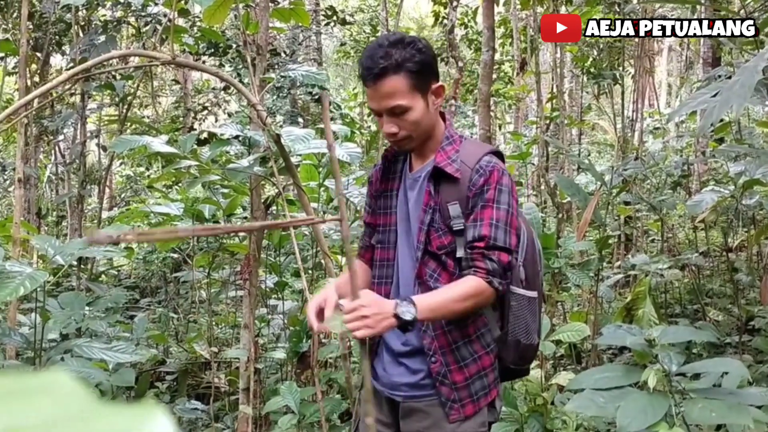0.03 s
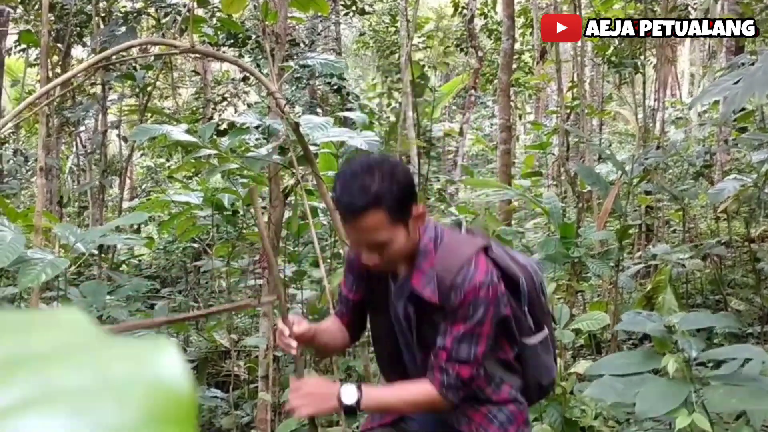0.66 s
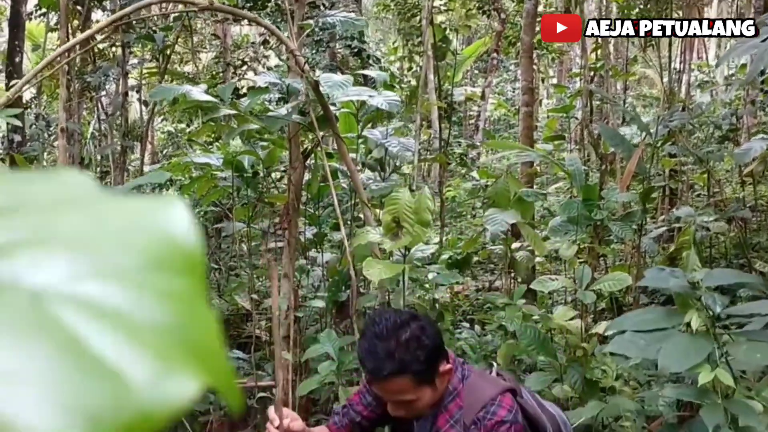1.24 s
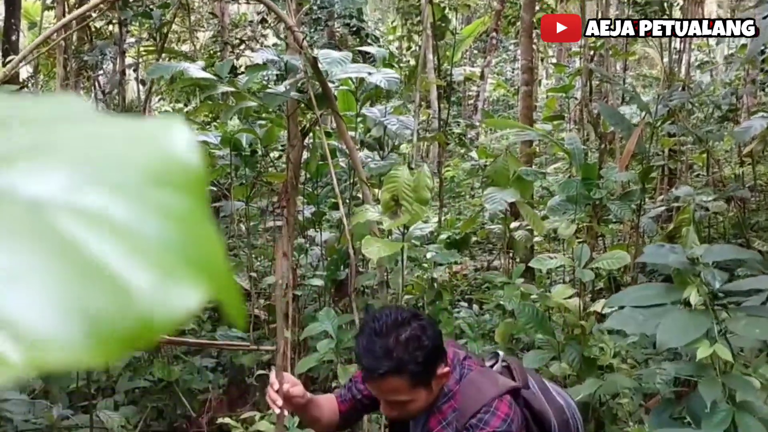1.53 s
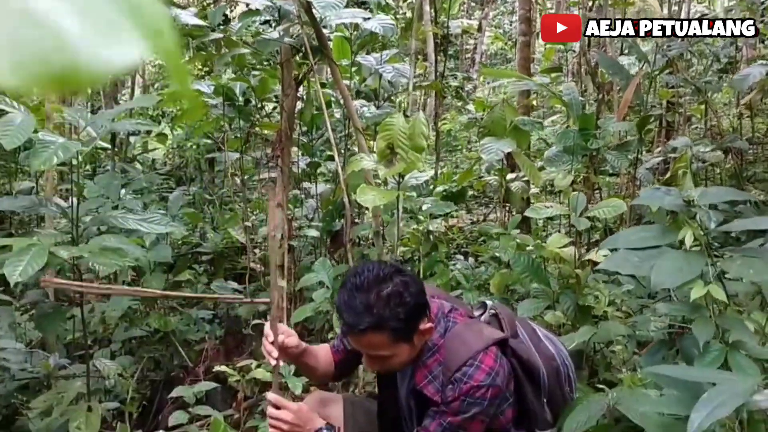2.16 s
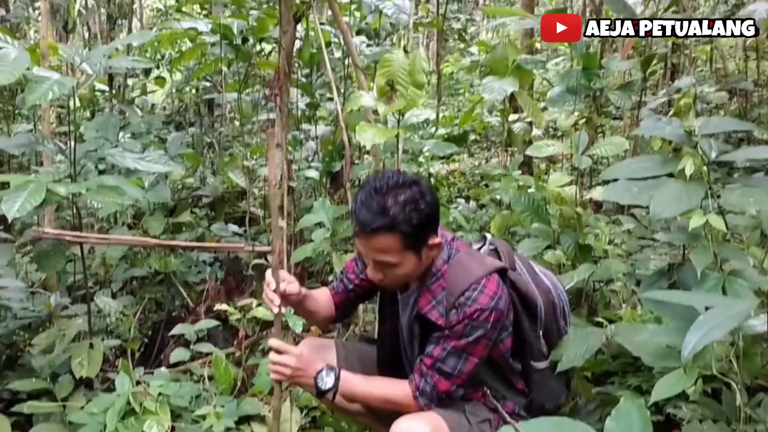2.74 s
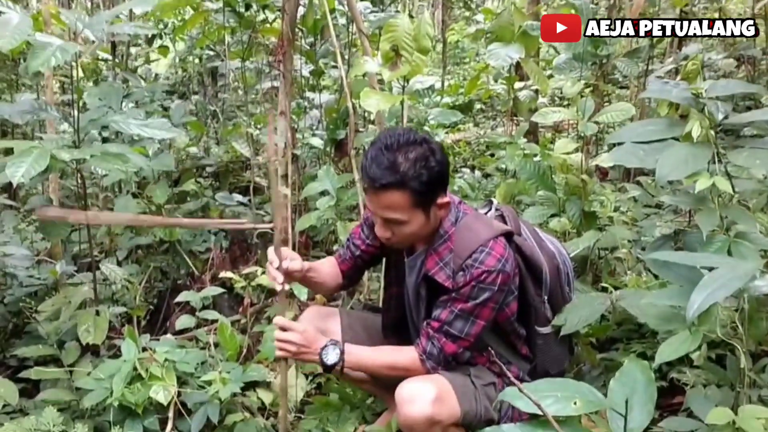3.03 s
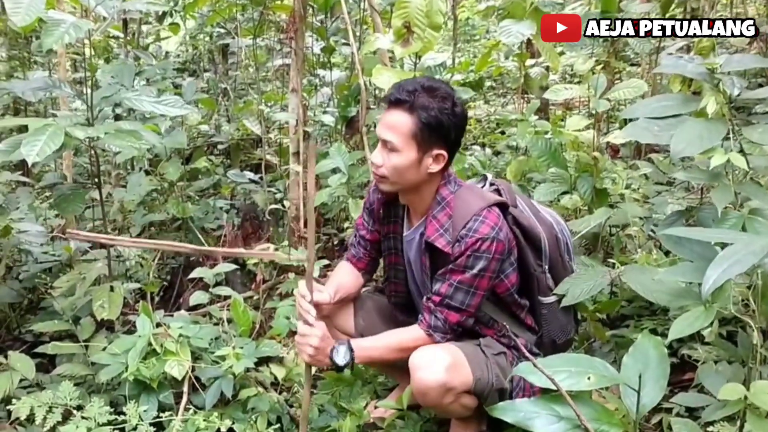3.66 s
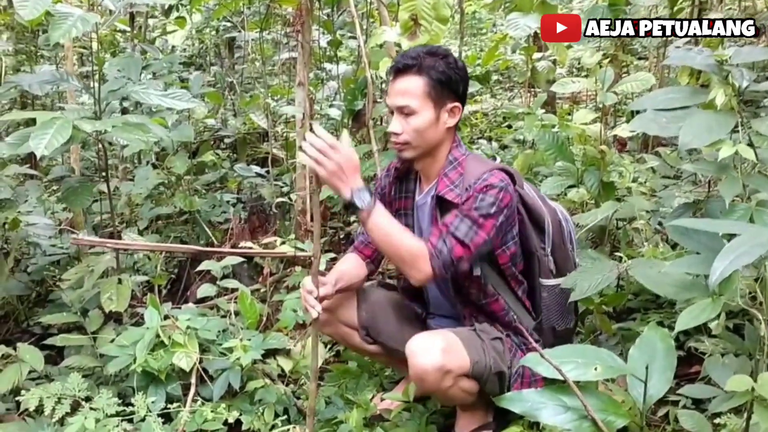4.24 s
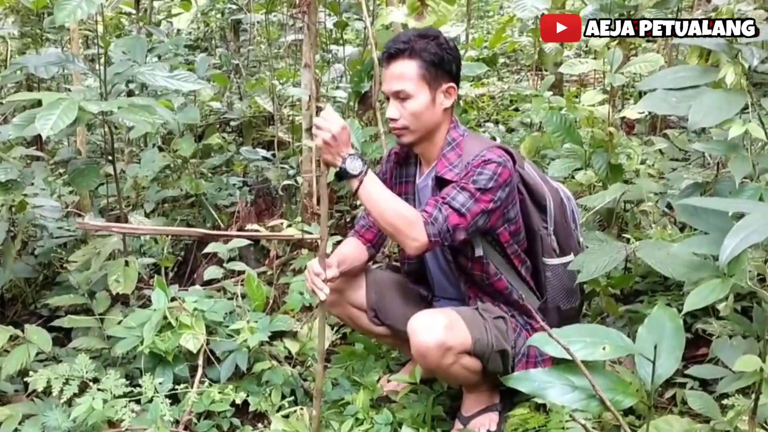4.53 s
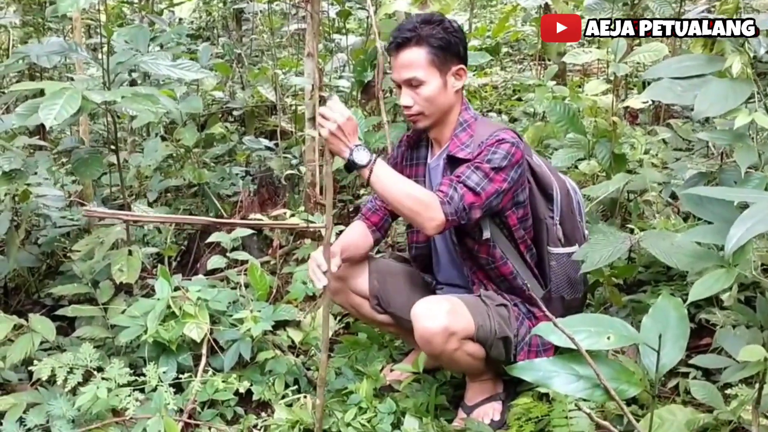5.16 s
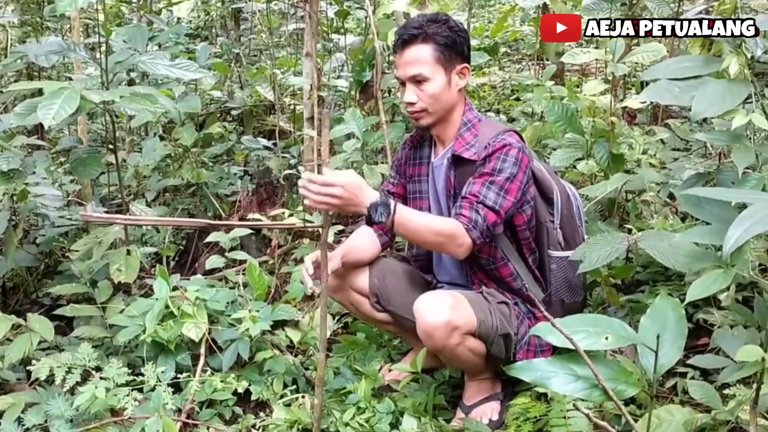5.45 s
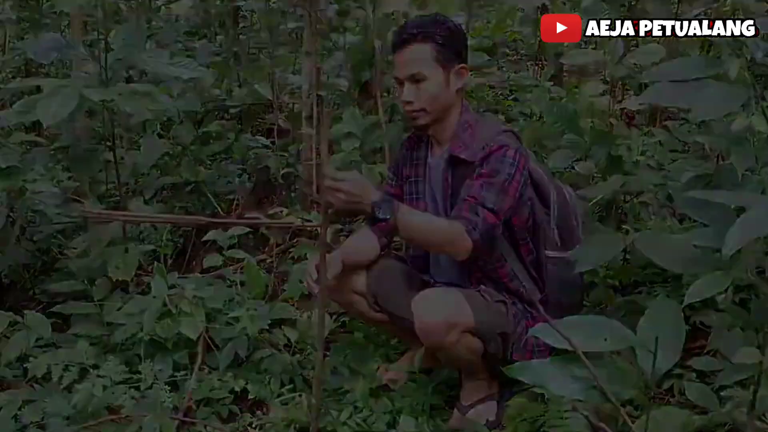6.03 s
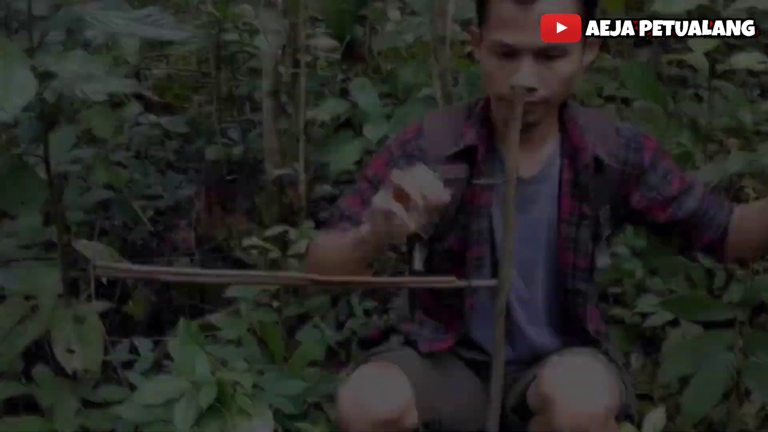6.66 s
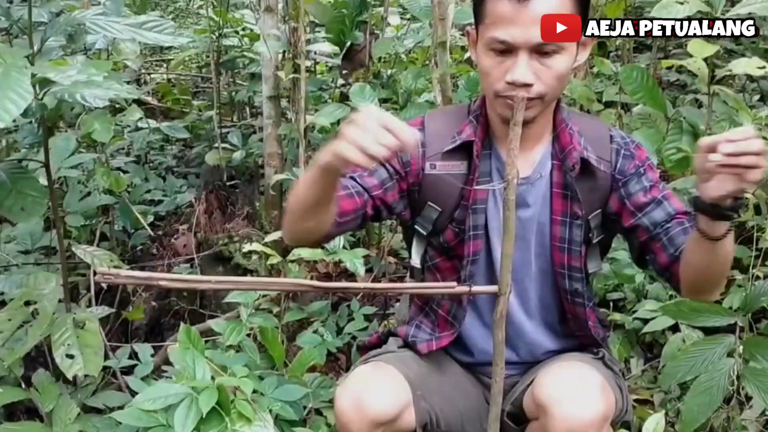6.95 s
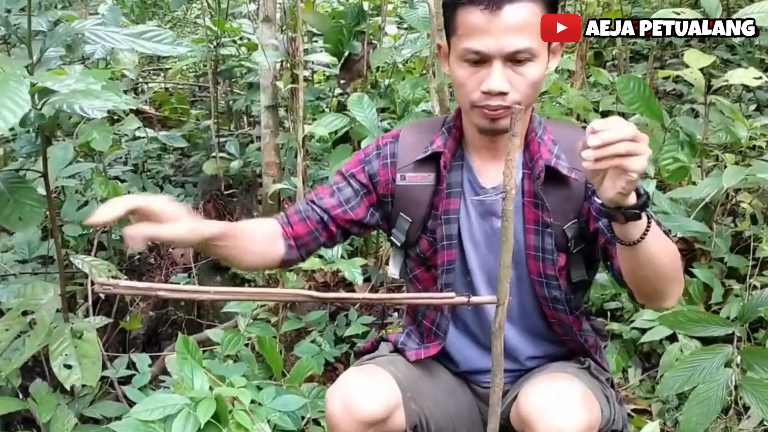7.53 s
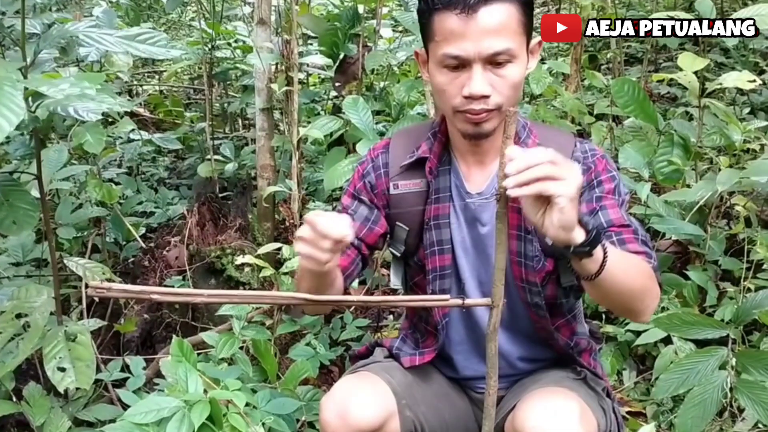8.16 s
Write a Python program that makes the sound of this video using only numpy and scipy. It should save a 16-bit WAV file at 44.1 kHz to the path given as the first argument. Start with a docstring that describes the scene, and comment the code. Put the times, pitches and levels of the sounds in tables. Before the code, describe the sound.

A small bird repeats one rising whistle nearly four times a second, echoing through a forest over hushed air and shrill cicadas and crickets. Someone nearby handles a stick in the undergrowth, making a few light knocks and leafy crackles. A far bird hoots softly and a cicada's whine swells. Everything fades to a brief silence, then returns quieter, with the whistling bird further off.

```python
"""A small forest bird repeats one rising whistle, nearly four times a second; trunks and leaves echo it.
Cicadas and crickets shrill over hushed air, a far bird hoots softly, and a thin call sounds once.
Someone handles a stick in the undergrowth: a few ringing knocks and leafy crackles.
The sound fades to silence and comes back at a quieter spot, where the bird is further off."""
import sys
import numpy as np
from scipy import signal
from scipy.fft import rfft, irfft, next_fast_len
from scipy.io import wavfile
from scipy.ndimage import map_coordinates

SR = 44100
rng = np.random.default_rng(int(sys.argv[2]) if len(sys.argv) > 2 else 0)


def pcm_store(signal):
    """Save signal as 16-bit PCM."""
    levels = np.round(np.clip(np.atleast_2d(signal), -1, 1) * 32767)
    wavfile.write(sys.argv[1], SR, levels.astype(np.int16).T)


N = 370440
TIME_S = np.arange(N) / SR
EVENT_SAMPLES = SR // 4
MOVE_S = 6.6  # to the quieter spot


def amp(db):
    """Decibels to gain."""
    return 10 ** (np.asarray(db) / 20)


def unit(x):
    """x at rms 1."""
    return x / np.sqrt(np.mean(x ** 2) + 1e-20)


def ramp(x):
    """Smooth step from 0 to 1 over x = 0..1."""
    return np.sin(np.pi / 2 * np.clip(x, 0, 1)) ** 2


def bell(t, half_width_s):
    """Gaussian: 1 at t = 0, 1/e at the half width."""
    return np.exp(-(t / half_width_s) ** 2)


def wobble(rate_hz, size=N):
    """Smooth random curve, rate_hz knots a second."""
    knots = rng.standard_normal(int(size * rate_hz / SR) + 4)
    return map_coordinates(knots, [np.arange(size) * rate_hz / SR])


def filtered(x, response):
    """x through a gain that is a function of Hz."""
    size = next_fast_len(len(x) + 8192)
    return irfft(rfft(x, size) * response(np.fft.rfftfreq(size, 1 / SR)), size)[:len(x)]


def noise(spectrum, size=N):
    """Noise of rms 1 with a (Hz, dB) spectrum."""
    knots_hz, db = np.transpose(spectrum)
    white = rng.standard_normal(size)
    return unit(filtered(white, lambda hz: amp(np.interp(np.log(hz + 1), np.log(knots_hz), db))))


def add(track, s, sound):
    """Mix a sound in at time s, cropped to the track."""
    start = round(s * SR)
    first, last = max(start, 0), min(start + len(sound), N)
    if last > first:
        track[first:last] += sound[first - start:last - start]


def background(first_db, second_db, swells=()):
    """Gain of a background: steady at each spot, with swells at the first."""
    swell_power = sum((amp(db) * bell(TIME_S - s, width_s)) ** 2 for s, db, width_s in swells)
    return np.where(TIME_S < MOVE_S, np.sqrt(amp(first_db) ** 2 + swell_power), amp(second_db))


def foliage(x, scatter_db, spread_s, count=6):
    """Branches beside the path add weak late copies, which beat against the sweep."""
    path = np.zeros(EVENT_SAMPLES)
    path[0] = 1
    delays = (rng.uniform(0.069, 1, count) * spread_s * SR).astype(int)
    path[delays] = amp(scatter_db) * rng.choice([-1, 1], count)
    return signal.fftconvolve(x, path / np.linalg.norm(path))


def tree_echo(x, t60_s=1.0, early_t60_s=0.33, early_db=11, build_s=0.012, clumps_db=2.5):
    """Echo of x at rms 1: near trunks answer first, then the depth of the forest."""
    t = np.arange(SR) / SR
    decay = np.hypot(amp(-60 * t / t60_s), amp(early_db - 60 * t / early_t60_s))
    tail = rng.standard_normal(SR) * decay * (1 - bell(t, build_s)) * amp(clumps_db * wobble(120, SR))
    return unit(signal.fftconvolve(x, tail))


def whistling_bird():
    """One pure tone holds, catches, sweeps up and tips over; it arrives direct and off the trees."""
    # Whistles. Each row: time of the top in seconds, top in Hz, top in relative dB, rise length ratio.
    whistles = [(-.025, 3505, -20, 1.05), (.238, 3464, -18.5, .92), (.511, 3485, -20, 0.93),
                (.772, 3430, -20.5, 0.91), (1.056, 3460, -20, 1), (1.334, 3464, -20.5, 0.84),
                (1.619, 3446, -20.5, 0.94), (1.902, 3424, -21.5, 1), (2.161, 3465, -20.5, 0.84),
                (2.441, 3460, -18.5, 1.05), (2.716, 3477, -13, 1.04), (2.986, 3411, -11.5, 0.94),
                (3.253, 3415, -12.5, 0.98), (3.538, 3496, -12, 0.97), (3.817, 3447, -12, 0.99),
                (4.089, 3397, -14, 0.87), (4.35, 3450, -12.5, 0.89), (4.618, 3433, -14, 0.9),
                (4.898, 3500, -14, 0.89), (5.177, 3498, -13.5, 0.91), (5.467, 3458, -15.5, 0.88),
                (5.762, 3410, -15.5, 0.96), (6.041, 3440, -13.5, .92), (6.322, 3450, -16.5, 0.85),
                (6.812, 3530, -30.5, 1), (7.101, 3544, -37.5, 0.75), (7.378, 3450, -40.5, 0.91),
                (7.651, 3577, -33, 0.79), (7.952, 3580, -34, 0.91), (8.22, 3526, -30.5, 0.88)]
    # The bird behind leaves, in the clear, then far off. Each row: start in seconds, opening note in
    # Hz and relative dB, catch in seconds before the top, then in relative dB: glide, echo,
    # opening's weight in the echo, stray paths, octave.
    stages = [(-1, 2050, -29.5, 0.034, -25.5, -31, -9.5, -12, -64),
              (2.5, 1985, -35, .041, -27.5, -29, -19, -17, -67),
              (6.5, 1940, -35.5, 0.027, -32, -42.5, -16.5, -8, -65.5)]
    opening_s, swell_s, hold_s, release_s = 0.079, 0.024, 0.0041, 0.021
    rise_s, fall_s, jump_share = 0.0245, 0.034, 0.38
    track = np.zeros(N)
    t = np.arange(-EVENT_SAMPLES // 2, EVENT_SAMPLES // 4) / SR  # 0 at the top of the pitch
    scoop_hz = 189.8 * np.exp(-np.maximum(t + opening_s, 0) / 0.008)
    envelope = np.sqrt(ramp((t + opening_s) / swell_s)) * ramp(1 - (t - hold_s) / release_s)
    jump = ramp((t + 0.013) / 0.004)  # in level, just before the top
    ends_s = [stage[0] for stage in stages[1:]] + [np.inf]
    for stage, end_s in zip(stages, ends_s):
        start_s, open_hz, open_db, catch_s, glide_db, echo_db, open_echo_db, stray_db, octave_db = stage
        calls = [call for call in whistles if start_s <= call[0] < end_s]
        mean_db = np.mean([call[2] for call in calls])
        sweeping = ramp((t + catch_s) / 0.0014)
        sag_db = -6 * bell(t + catch_s, 0.0068) * (1 - sweeping)  # into the catch
        for s, top_hz, top_db, stretch in calls:
            arch = bell(t, np.where(t < 0, rise_s * stretch, fall_s))
            low_hz = open_hz + 14.5 * rng.standard_normal()
            waver = 1 + 0.0043 * wobble(256, len(t))
            pitch_hz = (low_hz + (top_hz - low_hz) * arch - scoop_hz) * waver
            phase = 2 * np.pi * np.cumsum(pitch_hz) / SR
            # the higher the note, the harder the bird sings
            push = jump_share * jump + (1 - jump_share) * arch
            level_db = open_db + sag_db + sweeping * (glide_db - open_db) + push * (top_db - glide_db)
            direct = foliage(np.sin(phase) * envelope * amp(level_db - 0.77), stray_db, spread_s=0.012)
            effort = envelope * amp(sag_db + open_echo_db * (1 - sweeping - push) / 2)
            echo = tree_echo(effort * np.sin(phase)) * amp(echo_db - 10 + 0.49 * (top_db - mean_db))
            octave = foliage(effort * np.sin(2 * phase) * amp(octave_db), -2.5, spread_s=0.033)
            for part in (direct, echo, octave):
                add(track, s + t[0], part)
    return track


def cicadas(whine_db=-41.5, full_s=5.8, attack_s=0.52, climb_hz_per_s=70, drift_hz=3.46):
    """One near cicada whines in close, climbing tones over the shrill band of the far ones."""
    # Near whine. Each row: pitch at full_s in Hz, relative level in dB.
    tones = [(4385, -60), (4428, -61), (4468, -60), (4562, -54), (4605, -62)]
    # Far chorus spectrum. Each row: frequency in Hz, relative density in dB.
    band = [(3900, -49), (4280, -28), (4430, 2), (4570, -5.5), (4670, 1), (4800, -19.5), (5600, -53.5)]
    # Chorus swells. Each row: peak time in seconds, relative level in dB, half width in seconds.
    swells = [(.1, -50.5, 1.9), (4.85, -55, 0.48), (5.75, -47.5, 0.7), (6.404, -44, 0.35)]
    climb_hz = climb_hz_per_s * (TIME_S - full_s)
    whine = np.zeros(N)
    for hz, db in tones:
        gain = amp(db + 2 * wobble(8.5))
        pitch_hz = hz + climb_hz + drift_hz * wobble(25)
        whine += gain * np.sin(2 * np.pi * np.cumsum(pitch_hz) / SR)
    envelope = ramp(1 + (TIME_S - full_s) / attack_s) * (TIME_S < MOVE_S)
    chorus = noise(band) * amp(1 + 0.8 * wobble(25)) * background(-60, -63, swells)
    return chorus + unit(whine) * envelope * amp(whine_db)


def crickets():
    """A high, flickering band of shrilling and a fainter, narrow trill."""
    # Chorus and trill spectra. Each row: frequency in Hz, relative density in dB.
    chorus_band = [(6000, -43), (6600, -19), (7300, -7.5), (7900, -6.5), (8450, 3), (8950, -4),
                   (9500, -18.5), (10500, -53.5)]
    trill_band = [(6300, -36.5), (6650, -10.5), (6820, -10), (6950, -9.5), (7300, -32)]
    chorus = noise(chorus_band) * background(-56, -68) * amp(0.8 * wobble(30))
    return chorus + noise(trill_band) * amp(-67 + 1.5 * wobble(23))


def air():
    """A broad, slightly wavering hush, strongest in the bass."""
    # Air spectrum. Each row: frequency in Hz, relative density in dB.
    band = [(20, 16), (50, 6.5), (110, 3.5), (190, -3), (330, -2), (500, -6), (1600, -5.5), (3500, -3),
            (4100, -9.5), (5800, -21), (7500, -24.5), (10000, -23), (12500, -23.5), (15300, -19.5)]
    return noise(band) * background(-40, -48.5) * amp(0.83 * wobble(8))


def leaf_rustle():
    """Leaves brush and shift in small fits."""
    # Rustle spectrum. Each row: frequency in Hz, relative density in dB.
    band = [(3000, -16.5), (6000, -3), (9000, 4), (12500, -5), (14200, 2.5), (15300, 4.5)]
    # Leaf brushes. Each row: peak time in seconds, relative level in dB, half width in seconds.
    brushes = [(1.173, -51.5, 0.18), (2.72, -56, 0.072), (3.22, -53.5, 0.091), (3.7, -49, 0.3),
               (4.52, -55, 0.054)]
    fits = unit(amp(3 * wobble(8.4) + 3 * wobble(400)))
    return noise(band) * fits * background(-66, -72, brushes) * amp(5)


def stick_knocks(gain_db=3, attack_s=0.00073):
    """Each knock rings the same short wooden modes, shifted in pitch and at slightly new strengths."""
    # Knocks. Each row: start in seconds, relative level in dB, pitch ratio.
    knocks = [(.532, -35, 1.84), (1.166, -31, 0.99), (3.603, -32.5, 1.25), (3.72, -36, 1.2),
              (3.917, -38.5, 1), (3.938, -40, 1.15), (6.376, -37, 1.17)]
    # Wood modes. Each row: frequency at ratio 1 in Hz, relative level in dB, T60 in seconds.
    modes = [(660, -6, 0.063), (870, -5, 0.086), (1095, -4, .03), (1485, 1, 0.043), (1724, -10, 0.029)]
    track = np.zeros(N)
    t = np.arange(EVENT_SAMPLES) / SR
    for s, db, ratio in knocks:
        ring = np.zeros(len(t))
        for hz, mode_db, t60_s in modes:
            decay = amp(mode_db + rng.standard_normal() - 60 * t / t60_s)
            ring += decay * np.sin(2 * np.pi * hz * ratio * t + wobble(370, len(t)))
        add(track, s, ring * amp(db + gain_db) * (1 - np.exp(-t / attack_s)))
    return track


def leaf_crackles(gain_db=6, attack_s=0.0018):
    """Tiny fractures in dry leaves merge into bright bursts of noise."""
    # Crackles. Each row: start in seconds, relative level in dB, T60 in seconds.
    crackles = [(0.868, -46.5, .12), (.901, -41.5, 0.046), (1.012, -45, 0.14), (3.558, -30, 0.039),
                (3.569, -29.5, 0.087), (3.605, -21, 0.063), (3.616, -32, 0.15), (3.716, -33, .12),
                (3.768, -35.5, 0.11), (3.835, -36.5, 0.065), (4.49, -53.5, .13), (6.376, -48.5, .05),
                (7.64, -55.5, 0.091)]
    band = [(700, -17.5), (2200, 5), (5000, -5.5), (8000, 2.5), (12000, 1), (15000, 3.5)]
    track = np.zeros(N)
    t = np.arange(EVENT_SAMPLES) / SR
    for s, db, t60_s in crackles:
        envelope = amp(db + gain_db - 60 * t / t60_s) * (1 - np.exp(-t / attack_s))
        add(track, s, noise(band, len(t)) * envelope)
    return track


def hooting_bird(gain_db=2.5, half_width_s=0.017, rough_rad=0.3, vary_db=4.2, vary_ratio=0.012):
    """Soft low hoots at an even pace, blurred by distance."""
    # Hoot runs. Each row: first time, last time and spacing in seconds, pitch in Hz, relative dB.
    runs = [(2.728, 4.48, .193, 364, -49.5), (4.875, 6.11, .205, 398, -52.5), (7.085, 8.2, .222, 430, -57)]
    track = np.zeros(N)
    t = np.arange(-EVENT_SAMPLES // 2, EVENT_SAMPLES // 2) / SR
    for first_s, last_s, gap_s, hz, db in runs:
        for s in np.arange(first_s, last_s + gap_s / 2, gap_s):
            loud, sharp = rng.standard_normal(2)
            phase = 2 * np.pi * hz * (1 + vary_ratio * sharp) * t + rough_rad * wobble(70, len(t))
            envelope = amp(db + gain_db + vary_db * loud) * bell(t, half_width_s)
            add(track, s + t[0], envelope * np.sin(phase))
    return track


def thin_call(peak_s=4.65, level_db=-57.5, half_width_s=0.065):
    """A high note from deep in the trees, smeared into a narrow hiss."""
    band = [(5200, -26), (5900, 0), (6300, 1.5), (7000, -30)]
    return noise(band) * amp(level_db) * bell(TIME_S - peak_s, half_width_s)


def scene():
    """The whistling bird in front, the forest around it; mono."""
    bird = whistling_bird()
    forest = cicadas() + crickets() + air() + leaf_rustle()
    handling = stick_knocks() + leaf_crackles()
    return (bird + forest + handling + hooting_bird() + thin_call())[None]


def record(dry):
    """A fade-out cut short by silence, a fade-in, and a low-pass."""
    mute_s, resume_s, cutoff_hz = 6.52, 6.652, 15500
    fade_out = np.clip((6.598 - TIME_S) / 0.78, 0, 1) * (TIME_S < mute_s)
    fade_in = np.clip((TIME_S - resume_s) / 0.7, 0, 1)
    return filtered(dry[0] * (fade_out + fade_in) ** 1.28, lambda hz: hz < cutoff_hz)[None]


dry = scene()
out = record(dry)
pcm_store(out)
```